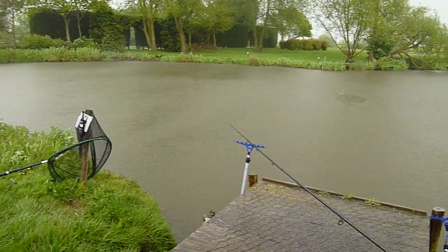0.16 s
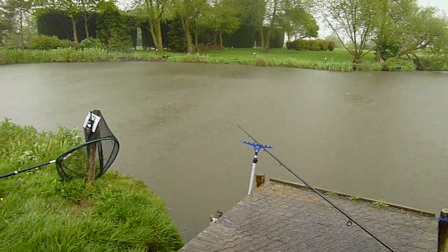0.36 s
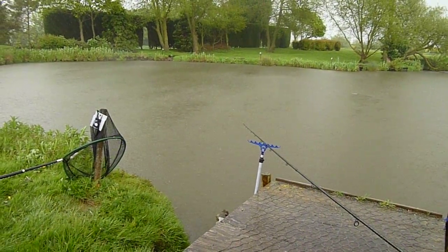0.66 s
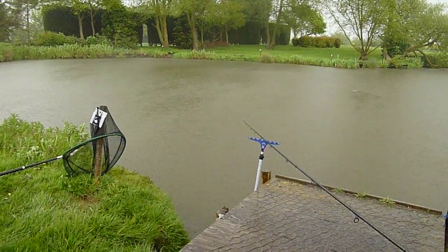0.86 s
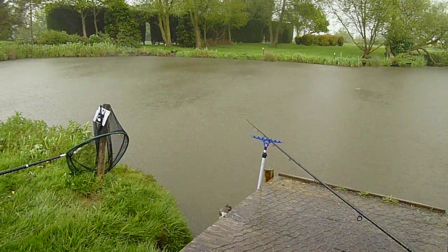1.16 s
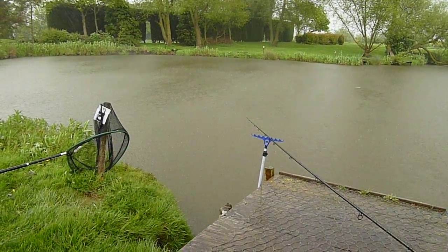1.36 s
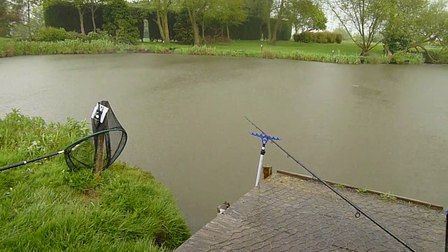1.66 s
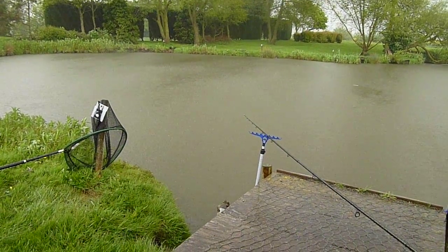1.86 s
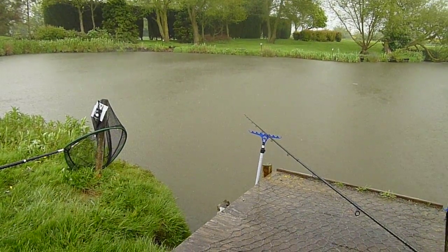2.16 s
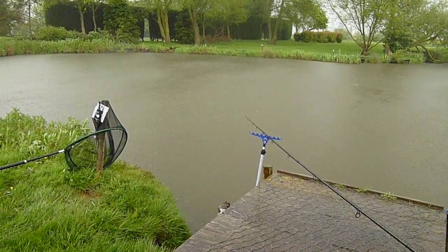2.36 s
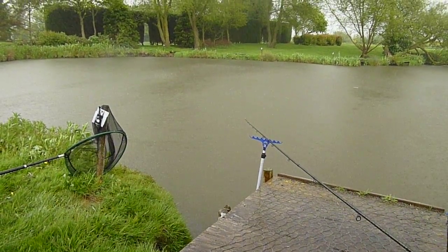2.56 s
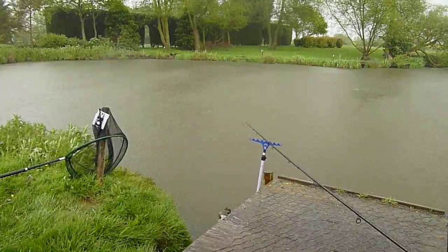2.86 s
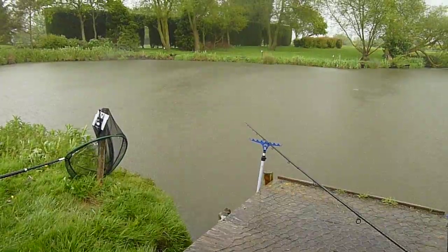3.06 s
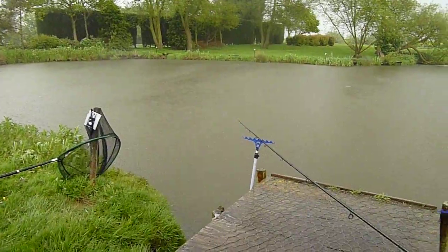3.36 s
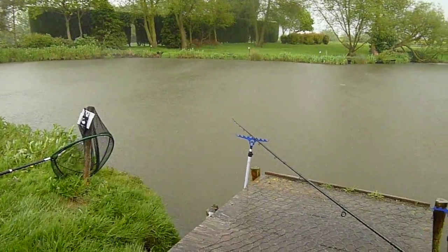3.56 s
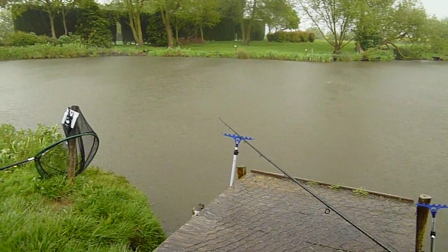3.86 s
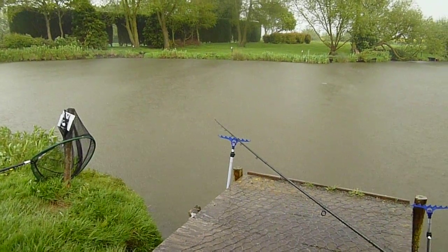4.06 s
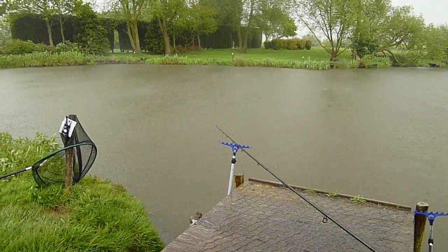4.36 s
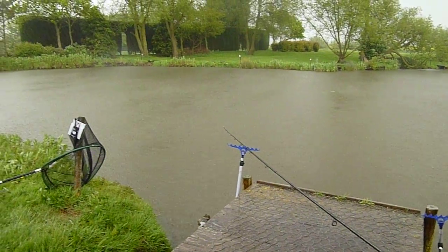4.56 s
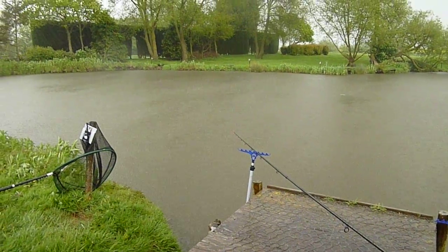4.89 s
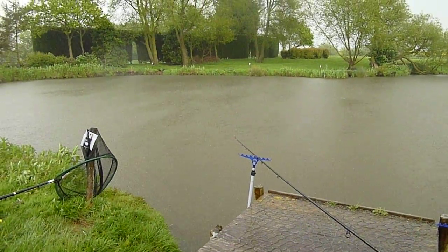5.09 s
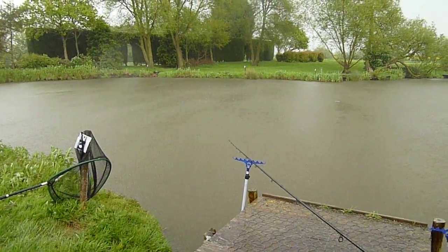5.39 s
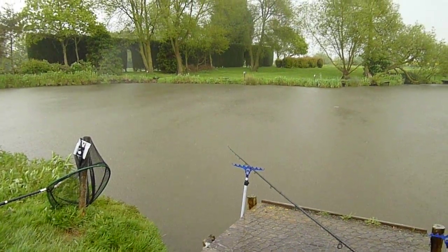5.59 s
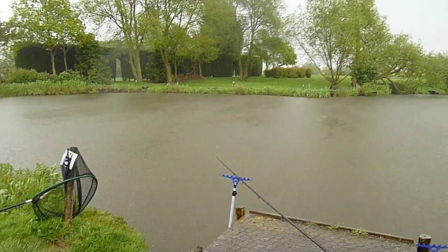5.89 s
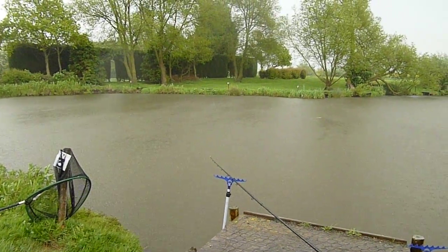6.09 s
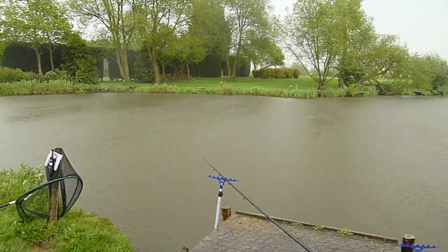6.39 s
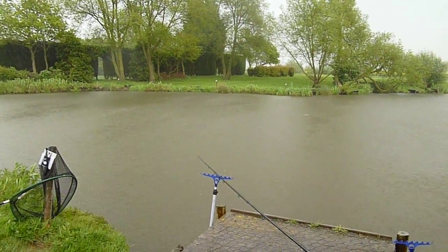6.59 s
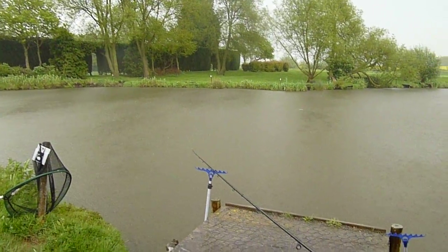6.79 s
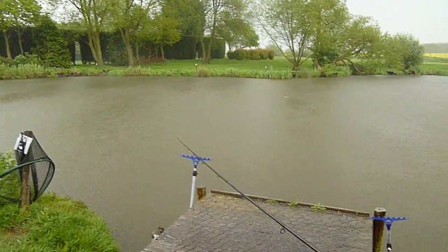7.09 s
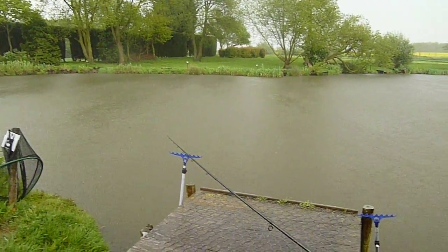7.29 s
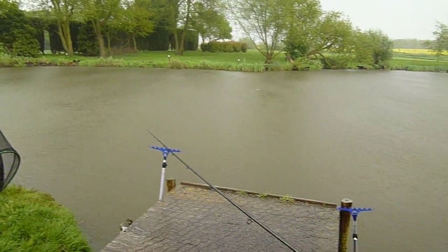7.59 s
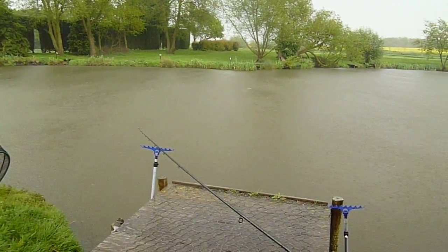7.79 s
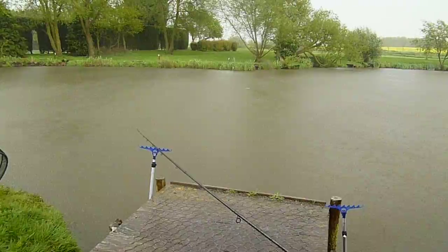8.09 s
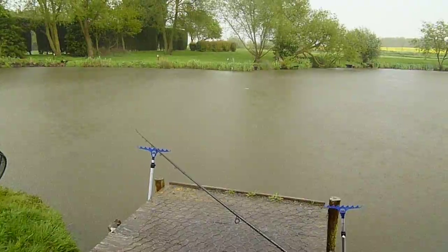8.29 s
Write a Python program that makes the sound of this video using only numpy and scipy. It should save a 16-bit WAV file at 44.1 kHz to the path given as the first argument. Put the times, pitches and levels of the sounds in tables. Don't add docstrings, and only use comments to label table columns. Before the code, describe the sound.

Heavy rain runs throughout beside a pond, heard by a microphone close under taut umbrella cloth. Countless distant drops on water and grass blur into a wide, midrange roar; nearer drops patter densely, and large ones snap crisply overhead at irregular moments. From 0.5 to 0.9 seconds short, low wind puffs thump the microphone. Between 1 and 4 seconds the rain dominates, wavering in small surges and lulls, with only faint bumps. Around 4.3 a soft gust rumbles, and the rain turns brighter and harder near 4.5 to 5. From 5.1 to 5.75 fluttering thuds cluster, the hardest at 5.54; the rain drops noticeably quieter, then recovers by about 6.1 to 6.6. Small puffs follow, with another strong thump at 7.1 and more buffets until 7.6. Rain brightens and surges around 8, continuing to the end at 8.4.

```python
import sys
import numpy as np
from scipy import signal
from scipy.fft import rfft, irfft
from scipy.io import wavfile

SR = 44100
rng = np.random.default_rng(int(sys.argv[2]) if len(sys.argv) > 2 else 0)


def generate_wav(sig):
    pcm = np.round(np.clip(np.atleast_2d(sig).T, -1, 1) * 32767).astype(np.int16)
    wavfile.write(sys.argv[1], SR, pcm)


def voltage_ratio(decibels):
    exponent = np.asarray(decibels, float) / 20
    return 10 ** exponent


N = 372204

# t/s, level/dB, hardness/dB
RAIN_LEVEL = [(0.0, -30.5, -10), (0.5, -26, -6), (1.1, -29, -8.5), (1.45, -28.5, -5.5), (1.85, -27.5, -9),
              (2.3, -25.5, -7.5), (2.65, -29.5, -11), (3.5, -26.5, -11.5), (4.0, -27, -10),
              (4.5, -24, -4.5), (4.85, -29, -3.5), (5.02, -27.5, -3.5), (5.5, -34.5, -8.5),
              (5.72, -39.5, -8), (6.1, -30, -10), (6.6, -27, -9), (6.96, -30.5, -10.5), (8.44, -29.5, -5)]
# t/s, change/dB, length/s
RAIN_SHEETS = [(0.2, -1.5, 0.12), (0.318, 0, 0.15), (1.32, 1, 0.13), (1.614, 0.5, 0.25), (2.02, 1.5, 0.16),
               (2.774, -1.5, 0.065), (3.063, 1, 0.04), (3.215, -6, 0.025), (3.47, 1, 0.15),
               (3.62, -3, 0.06), (4.264, 1.5, .1), (4.391, -2.5, .06), (5.168, -3, .04), (5.956, 2.5, .12),
               (6.047, 1, 0.1), (6.396, -1, 0.39), (7.487, 2.5, 0.145), (7.978, 4, 0.02), (8.032, 3, 0.055),
               (8.166, 2, 0.044), (8.445, -10, .015)]
# t/s, peak level/dB, sharpness/dB
SNAPS = [(0.1878, -11.5, -10.1), (0.2799, -11.7, -2.8), (0.4392, -10.2, -5.8), (0.4964, -11.5, 1),
         (0.6037, -11.7, -3.6), (0.6515, -11, 1), (0.8907, -9.3, -4.9), (1.0857, -14, -3.0),
         (1.1276, -12.3, -12), (1.3249, -10.2, -7.9), (2.3578, -10.9, 0.5), (2.4785, -12.5, 1),
         (2.7692, -10.3, 2.0), (2.7755, -10.6, -10.0), (2.8074, -14.6, -9.6), (2.8176, -13.2, -4.8),
         (3.2243, -11.5, -8.9), (3.3888, -12.8, -1.9), (3.57, -9.9, -5.8), (4.6835, -8.7, -2.9),
         (5.4809, -21, 3), (5.7094, -27.5, -11), (5.7214, -24, -8), (5.8118, -21, -7.2),
         (6.0398, -16, -6.8), (7.1713, -11.2, -6.2), (7.2567, -11, -7.1), (7.2959, -12.7, -7.1),
         (7.5183, -11, -1), (7.9804, -12.5, 1.4)]
# f/Hz, level/dB per Hz
RAIN_SPECTRUM = [(30, -32), (120, -10), (255, -3.5), (430, -3.5), (691, 0), (1060, -1.5), (1390, -1.5),
                 (2200, -5.5), (3000, -8.5), (3940, -13.5), (6630, -19.5), (7760, -27), (8890, -49),
                 (9300, -72.5), (11000, -110)]
# t/s, level/dB
WIND_LEVEL = [(0.0, -41.5), (0.33, -45), (0.75, -40), (0.87, -48), (4.09, -42), (4.28, -35), (4.72, -51),
              (5.08, -48), (5.36, -34.5), (5.57, -37.5), (5.78, -50.5), (6.25, -43), (6.77, -50.5),
              (7.29, -41), (8.11, -50.5), (8.44, -44.5)]
# f/Hz, level/dB per Hz
RUMBLE_SPECTRUM = [(30, -31), (70, -7), (110, 2), (160, 3.5), (280, -2.5), (480, -15), (900, -58)]
# f/Hz, level/dB per Hz
SWELL_SPECTRUM = [(12, -13.5), (30, -11), (60, -2.5), (85, -3), (130, -17.5), (300, -68)]
# t/s, peak level/dB, f/Hz, length/ms
STRONG_EDDIES = [(0.53, -16.5, 171, 3.6), (0.679, -29, 163, 5.2), (0.698, -25, 125, 15.7),
                 (0.721, -20.5, 202, 3.3), (0.894, -18, 160, 9.4), (4.263, -23, 110, 12),
                 (5.117, -21, 176, 8.6), (5.135, -23, 121, 7.2), (5.228, -13.5, 173, 5.2),
                 (5.274, -22, 202, 15), (5.317, -15, 175, 6.3), (5.339, -20, 145, 26),
                 (5.406, -18.5, 224, 12), (5.427, -18.5, 134, 16), (5.511, -13, 196, 5.4),
                 (5.54, -8.5, 164, 11), (5.558, -21, 200, 5.5), (5.666, -23, 176, 4.3),
                 (5.705, -19.5, 176, 4.5), (5.727, -18.5, 182, 7.4), (6.049, -21.5, 146, 8.1),
                 (6.264, -22.5, 180, 5.7), (7.059, -27, 174, 3.1), (7.1, -10, 191, 2.9),
                 (7.115, -23.5, 139, 17), (7.135, -16, 213, 6.3), (7.265, -17, 173, 6.7),
                 (7.327, -23.5, 113, 15), (7.542, -18.5, 140, 6.6), (7.582, -16, 162, 5.3)]
# t/s, peak level/dB, f/Hz
LIGHT_EDDIES = [(0.549, -25, 150), (0.755, -30, 159), (0.787, -26.5, 157), (0.869, -25, 166),
                (1.269, -28, 140), (1.656, -22.5, 150), (1.838, -34, 90), (2.105, -31.5, 90),
                (2.238, -30, 182), (2.815, -29, 80), (3.391, -26, 141), (3.423, -26.5, 100),
                (3.835, -32, 80), (4.325, -31.5, 150), (5.205, -34, 167), (5.454, -28, 122),
                (5.593, -29, 167), (5.639, -25, 198), (0.64, -24, 130), (6.006, -28, 150),
                (6.036, -28.5, 144), (6.39, -29.5, 120), (6.903, -29.5, 100), (7.308, -23.5, 134),
                (7.38, -24.5, 150), (7.726, -26, 100), (7.756, -29, 105), (7.798, -33.5, 110),
                (7.865, -33, 100), (7.076, -24, 80)]
# t/s, depth/dB, hold/s
GAIN_DUCK = (5.542, -6.5, .168)

CLOTH_SPOTS = 10
CHANCE_DROPS, DROP_OVER_RAIN_DB, DROP_SPREAD_DB = 120, 13.5, 1.2
SHARP_MEAN_DB, SHARP_SPREAD_DB = -7.5, 3.5
RUMBLE_DB, RUMBLE_FOLLOWS = -46.5, .98
EDDY_SWELL_DB, EDDY_RUMBLE_DB, EDDY_SPAN_S = -23, -25, .015
LIGHT_EDDY_SWINGS = 1
DEEP_DB, DEEP_PITCH, DEEP_LENGTH = -11, .56, 1.5
EDGE_DB, EDGE_SPREAD_DB = -11.5, 3.0
EDGE_DB_PER_OCTAVE, EDGE_DB_PER_DB = 6.5, .3
PORT_CUT_HZ, OFFSET = 47, .0169


def rms_one(x):
    return x / np.sqrt(np.mean(x ** 2) + 1e-20)


def highpass(x, order, cut_hz):
    return signal.sosfilt(signal.butter(order, cut_hz, "high", fs=SR, output="sos"), x)


def causal_pulse(points, tilt_db=0, ripple_db=0, size=2048):
    f_hz = np.maximum(np.fft.rfftfreq(size, 1 / SR), 10)
    point_hz, point_db = np.transpose(points)
    level_db = np.interp(np.log(f_hz), np.log(point_hz), point_db)
    level_db = level_db + tilt_db * np.log2(np.clip(f_hz, 300, 9000) / 2000)
    bumps = np.interp(f_hz, np.geomspace(200, 9000, 16), rng.standard_normal(16))
    cepstrum = irfft(np.log(voltage_ratio(level_db + ripple_db * bumps)))
    cepstrum[1:size // 2] *= 2
    cepstrum[size // 2 + 1:] = 0
    return irfft(np.exp(rfft(cepstrum)))


def through(x, pulse):
    return signal.oaconvolve(x, pulse)[:N]


def drift(rate_hz):
    r = np.exp(-80 * np.pi * rate_hz / SR)
    noise = rng.standard_normal(N // 40 + 2002)
    slow = signal.lfilter([1], [1, -2 * r, r * r], noise)[2000:]
    return np.interp(np.arange(N) / 40, np.arange(len(slow)), rms_one(slow - slow.mean()))


def far_rain(flicker_db):
    noise = rng.standard_normal(N) * voltage_ratio(flicker_db * drift(15.0))
    return rms_one(through(noise, causal_pulse(RAIN_SPECTRUM)))


def sheets_db():
    t = np.arange(N) / SR
    return sum(change_db * np.exp(-(2 * (t - at_s) / length_s) ** 2)
               for at_s, change_db, length_s in RAIN_SHEETS)


def rumble(points, lumpy_db, rate_hz):
    lumps = voltage_ratio(lumpy_db * drift(rate_hz))
    return rms_one(through(rng.standard_normal(N) * lumps, causal_pulse(points, size=8192)))


def all_eddies():
    light = [(at_s, peak_db, f_hz, LIGHT_EDDY_SWINGS * 1e3 / f_hz)
             for at_s, peak_db, f_hz in LIGHT_EDDIES]
    return list(STRONG_EDDIES) + light


def stir():
    power, t = np.zeros(N + 8000), np.arange(-4000, 4000) / SR
    for at_s, peak_db, *_ in all_eddies():
        power[round(at_s * SR) + np.arange(8000)] += voltage_ratio(2 * peak_db) * np.exp(-(t / EDDY_SPAN_S) ** 2)
    return np.sqrt(power[4000:N + 4000])


def puffs(wake):
    out, eddies = np.zeros(N), all_eddies()
    chance = rng.normal(0, 1, (len(eddies), 4))
    span = np.arange(-2000, 2000)
    t = span / SR
    for (at_s, peak_db, f_hz, length_ms), (turn, skew, shift, steep) in zip(eddies, chance):
        edge_db = EDGE_DB + EDGE_DB_PER_OCTAVE * np.log2(f_hz / 170)
        edge_db += EDGE_DB_PER_DB * (peak_db + 20) + EDGE_SPREAD_DB * steep
        bell = np.exp(-.5 * (t / (.00038 * length_ms)) ** 2)
        phase = 2 * np.pi * f_hz * t
        swing = np.sin(phase + .65 * turn)
        edge = voltage_ratio(edge_db) * bell * np.sin(phase * (2.23 + .2 * shift) + 3 * skew)
        long_bell = bell ** (DEEP_LENGTH ** -2)
        deep = voltage_ratio(DEEP_DB) * long_bell * np.sin(phase * DEEP_PITCH + turn)
        at = round(at_s * SR) + span
        around = voltage_ratio(-17) * np.exp(-.5 * (t / .012) ** 2) * wake[at]
        out[at] += voltage_ratio(peak_db) * (bell * (swing + edge) + deep + around)
    return highpass(out, 2, PORT_CUT_HZ)


def port_wind():
    wind_db = np.interp(np.arange(N) / SR, *np.transpose(WIND_LEVEL))
    eddies, churn = rumble(RUMBLE_SPECTRUM, lumpy_db=4.0, rate_hz=15.0), stir()
    stream = voltage_ratio(RUMBLE_DB + RUMBLE_FOLLOWS * (wind_db - wind_db.mean())) + voltage_ratio(EDDY_RUMBLE_DB) * churn
    swell_level = voltage_ratio(wind_db - 6.0) + voltage_ratio(EDDY_SWELL_DB) * churn
    swell = swell_level * rumble(SWELL_SPECTRUM, lumpy_db=6.0, rate_hz=14.0)
    return puffs(eddies) + stream * eddies + swell


def duck_db():
    at_s, depth_db, hold_s = GAIN_DUCK
    since_s = np.arange(N) / SR - at_s
    return depth_db * np.clip(np.minimum(since_s, hold_s - since_s) / .005, 0, 1)


def top_ticks(per_s, spread_db):
    born = rng.random(N) < per_s / SR
    ticks = born * voltage_ratio(spread_db * np.minimum(rng.exponential(1, N), 4))
    return rms_one(through(highpass(ticks + 1e-18, 4, 7800), causal_pulse(RAIN_SPECTRUM)))


def rebound(pulse, f_hz, share):
    r = np.exp(-np.pi * f_hz * 1.2 / SR)
    poles = [1, -2 * r * np.cos(2 * np.pi * f_hz / SR), r * r]
    late = signal.lfilter(poles[::-1], poles, pulse)
    return late if rng.random() < share else pulse


def patter(per_s, spread_db, cap, clump_db):
    born = rng.random(N) < per_s * voltage_ratio(clump_db * drift(35.0)) / SR
    sizes = born * voltage_ratio(spread_db * np.minimum(rng.exponential(1, N), cap))
    sizes = sizes * np.where(rng.random(N) < .7, -1, 1)
    spot = rng.integers(0, CLOTH_SPOTS, N)
    tilts_db = np.linspace(-1, 1, CLOTH_SPOTS) * 2.2
    pulses = [causal_pulse(RAIN_SPECTRUM, tilt_db=tilt, ripple_db=2.0) for tilt in tilts_db]
    pulses = [rebound(pulse, 700 * 2 ** rng.random(), share=.6) for pulse in pulses]
    return rms_one(sum(through(sizes * (spot == k), rms_one(p)) for k, p in enumerate(pulses)))


def all_drops(rain_db):
    at_s = rng.uniform(.01, 8.4, CHANCE_DROPS)
    loud, sharp = rng.standard_normal((2, CHANCE_DROPS))
    peak_db = rain_db[(at_s * SR).astype(int)] + DROP_OVER_RAIN_DB + DROP_SPREAD_DB * loud
    crowd = [at_s, peak_db, SHARP_MEAN_DB + SHARP_SPREAD_DB * sharp]
    return np.hstack([np.transpose(SNAPS), crowd])


def big_drops(rain_db):
    at_s, peak_db, sharp_db = all_drops(rain_db)
    steps_db = np.linspace(-16, 6, CLOTH_SPOTS)
    kind = np.abs(sharp_db[:, None] - steps_db).argmin(axis=1)
    late_s, back = rng.uniform([.00025, .2], [.0007, .6], (len(at_s), 2)).T
    out = np.zeros(N)
    for k, step_db in enumerate(steps_db):
        pulse = causal_pulse(RAIN_SPECTRUM, tilt_db=.35 * (step_db + 5), ripple_db=2.5)
        clicks, mine = np.zeros(N), kind == k
        at = np.round(at_s[mine] * SR).astype(int) - pulse.argmax()
        clicks[at] = -voltage_ratio(peak_db[mine] + .8)
        clicks[at + (late_s[mine] * SR).astype(int)] = voltage_ratio(peak_db[mine] + 4.5) * back[mine]
        out += through(clicks, pulse / pulse.max())
    return out


def scene():
    point_s, *columns = np.transpose(RAIN_LEVEL)
    rain_db, hard_db = [np.interp(np.arange(N) / SR, point_s, c) for c in columns]
    rain_db = rain_db + sheets_db()
    drops = patter(1200., spread_db=5.0, cap=2.8, clump_db=3.0)
    near = voltage_ratio(-1.5) * drops + voltage_ratio(-26) * top_ticks(150., spread_db=3.0)
    rain = near + voltage_ratio(-1.5) * far_rain(flicker_db=.77)
    rain = rain + (voltage_ratio(hard_db + 10.0) - 1) * highpass(rain, 1, 3000)
    wind = port_wind()
    ducked_db = rain_db + duck_db()
    return (voltage_ratio(ducked_db - 1.11) * rain + big_drops(ducked_db) + wind)[None]


def band_limit(x):
    return signal.sosfilt(signal.butter(12, 9040, fs=SR, output="sos"), x)


def record(dry):
    rounded = .55 * np.tanh(dry / .55)
    top = signal.butter(8, 9300, fs=SR, output="sos")
    mix = signal.sosfiltfilt(top, rounded) + OFFSET
    return band_limit(mix)


dry = scene()
out = record(dry)
generate_wav(out)
```